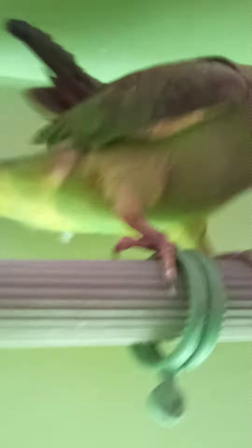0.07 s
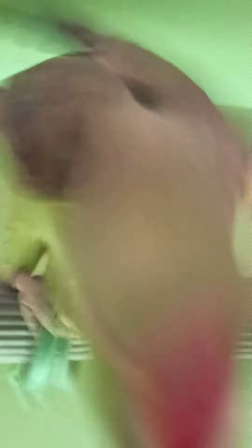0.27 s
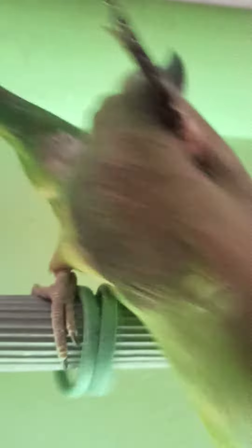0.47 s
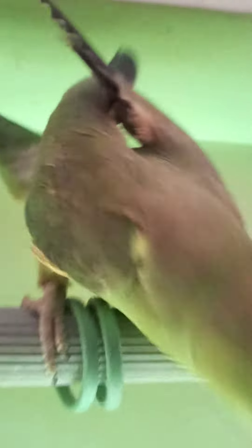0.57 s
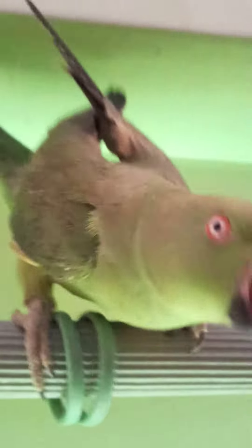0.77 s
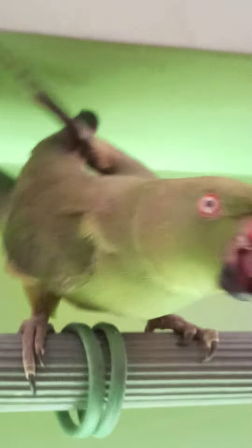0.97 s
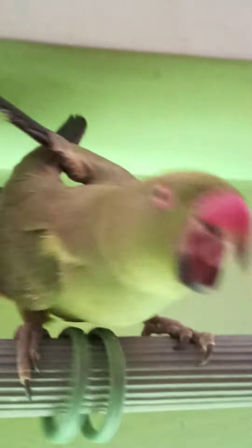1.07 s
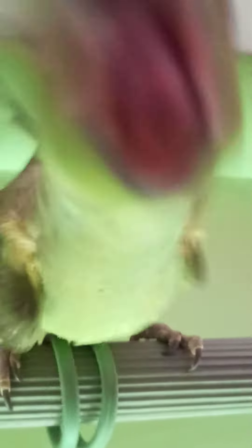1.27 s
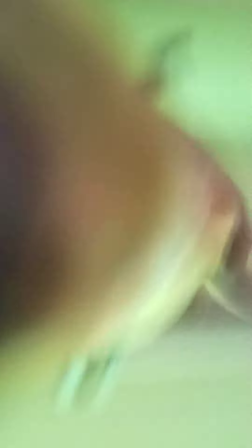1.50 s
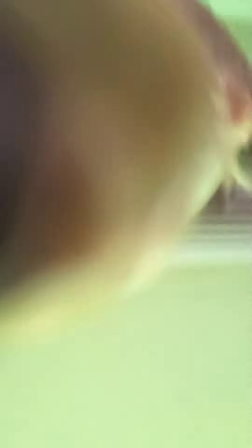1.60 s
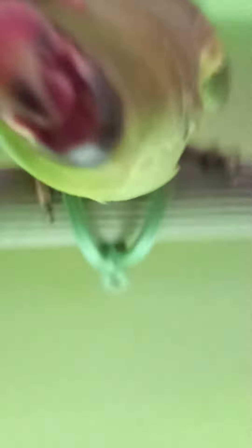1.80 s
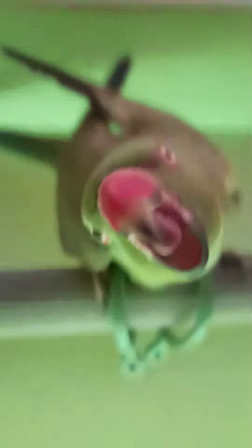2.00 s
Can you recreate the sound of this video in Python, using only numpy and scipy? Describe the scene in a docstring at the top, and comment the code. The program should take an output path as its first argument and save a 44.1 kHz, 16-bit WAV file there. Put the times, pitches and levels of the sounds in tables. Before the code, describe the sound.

A parrot squawks once from about 0.2 to 0.7 seconds, a shrill, rasping, rapidly pulsing call in a small room. Tiny claw ticks follow near 1 second. Its beak knocks and scrapes on the microphone in a quick cluster around 1.4 seconds and a louder one around 1.75, mostly on the left. Feathers rustle softly from 1.5 seconds to the end, over a faint appliance hum.

```python
"""Over a faint appliance hum, a parrot squawks once in a small room: a shrill, overtone-rich tone
from the syrinx, chopped into fast pulses that each arch in pitch. The pulses slow and shorten as
the call runs out. Claws tick on the perch, then the bird pecks and knocks at the microphone's
casing, mostly by the left port, with a soft rustle of feathers."""
import sys
import numpy as np
from scipy import signal
from scipy.fft import rfft, irfft, next_fast_len
from scipy.io import wavfile
from scipy.ndimage import uniform_filter1d, map_coordinates

SR = 44100
rng = np.random.default_rng(int(sys.argv[2]) if len(sys.argv) > 2 else 0)


def store_wav(level_fs):
    """Save 16-bit WAV to argv[1]."""
    pcm = np.round(np.clip(np.atleast_2d(level_fs), -1, 1) * 32767)
    wavfile.write(sys.argv[1], SR, pcm.T.astype(np.int16))


N = 90404
TIME_S = np.arange(N) / SR


def amp(db):
    """Decibels to gain."""
    return 10 ** (np.asarray(db) / 20)


def unit(x):
    """Scale to rms 1."""
    return x / np.sqrt(np.mean(x ** 2) + 1e-20)


def along(points, hz):
    """Read (freq_hz, value) points on a log frequency axis."""
    freqs, values = np.transpose(points)
    return np.interp(np.log(hz + 1), np.log(freqs + 1), values)


def automation(rows):
    """One value per sample for each column after the time."""
    times, *columns = np.transpose(rows)
    return [np.interp(TIME_S, times, column) for column in columns]


def wobble(rate_hz):
    """A smooth random curve, rate_hz knots a second."""
    knots = rng.standard_normal(int(N * rate_hz / SR) + 4)
    return map_coordinates(knots, [TIME_S * rate_hz])


def filtered(x, response):
    """Multiply the spectrum by response(hz)."""
    size = next_fast_len(N + SR // 2)
    return irfft(rfft(x, size) * response(np.fft.rfftfreq(size, 1 / SR)), size)[..., :N]


def eq(x, points):
    """Apply a (freq_hz, gain_db) curve."""
    return filtered(x, lambda hz: amp(along(points, hz)))


def noise(points):
    """Two unrelated coloured noises of rms 1."""
    return unit(eq(rng.standard_normal((2, N)), points))


def pan(db):
    """Constant-power gains, left louder than right by db."""
    return unit(amp([[db / 2], [-db / 2]]))


# Colour of the room tone: freq_hz, gain_db
AIR_EQ = [(25, -15), (50, -28), (90, -6.5), (150, -2), (250, -4), (370, -5), (550, -11), (1000, -15.5),
          (2500, -20.5), (4300, -26.5), (5300, -36), (7000, -30.5), (8500, -35), (12000, -31.5),
          (16000, -31)]
# Left-right likeness of the room tone: freq_hz, correlation
AIR_LIKENESS = [(60, 0.92), (300, 0.53), (700, 0.14), (1500, 0), (16000, 0.041)]

def room_tone(level_db=-45.5):
    """Soft room air, centred in the bass and wide in the treble."""
    def mid_side_gains(hz):
        angle = np.arccos(np.clip(along(AIR_LIKENESS, hz), -1, 1)) / 2
        return np.array([np.cos(angle), np.sin(angle)])

    mid, side = filtered(noise(AIR_EQ), mid_side_gains)
    return amp(level_db) * unit(np.array([mid + side, mid - side]))


# Partials of the appliance: pitch_hz, level_db
HUM_PARTIALS = [(199.5, -53.5), (399, -56), (598, -69.5)]

def appliance_hum():
    """A low hum whose partials waver slightly in phase."""
    return sum(amp(db) * np.sqrt(2) * np.sin(2 * np.pi * hz * TIME_S + 1.02 * wobble(6.66))
               for hz, db in HUM_PARTIALS)


# Feathers brushing near the microphone: time_s, level_db
RUSTLE_LEVELS = [(0, -66.5), (1.25, -60.5), (1.36, -60), (1.5, -50.5), (1.57, -51), (1.72, -51.5),
                 (1.81, -66), (1.86, -54), (1.92, -48), (1.98, -63), (2.05, -56)]
# Colour of the rustle: freq_hz, gain_db
FEATHER_EQ = [(300, -27), (1000, 4), (2500, 0.5), (4200, 1), (5400, -7.5), (7200, 9), (8500, -6.5),
              (12000, -9), (16000, -14.5)]

def feathers():
    """A soft, uneven rustle on the left as the bird leans in."""
    level_db, = automation(RUSTLE_LEVELS)
    return pan(db=13.5) * amp(level_db + 2.4 * wobble(63)) * noise(FEATHER_EQ)


# Claws on the perch: centre_s, level_db
CLAW_TICKS = [(.9405, -46), (.9790, -32)]
# Colour of a tick: freq_hz, gain_db
CLAW_EQ = [(1000, -22), (3500, -12), (7500, -2.5), (16000, -10)]

def claws(half_length_s=0.00021):
    """The claws shift on the perch with tiny, bright ticks."""
    envelope = sum(amp(db) * np.exp(-((TIME_S - s) / half_length_s) ** 2) for s, db in CLAW_TICKS)
    return envelope * noise(CLAW_EQ)


# Beak scraping into a knock: centre_s, half_length_s, level_db
BEAK_SCRAPES = [(1.437, 0.0077, -40.5), (1.753, 0.0069, -29.5), (1.765, 0.0088, -34),
                (1.776, 0.0049, -24.5)]
# Colour of beak contact, for scrapes and clicks: freq_hz, gain_db
BEAK_EQ = [(200, -1), (1000, 10), (2200, 0), (3300, 0), (4400, 2.5), (5500, -10.5), (7300, 11),
           (8600, -10.5), (12000, -7), (16000, -12.5)]

def beak_scrapes():
    """The beak slides briefly over the casing."""
    envelope = sum(amp(db) * np.exp(-((TIME_S - s) / half_s) ** 2) for s, half_s, db in BEAK_SCRAPES)
    return pan(db=8) * envelope * noise(BEAK_EQ)


# Beak hits on the casing: start_s, thump_db, thump_hz, rattle_db, click_db, pan_left_db
PECKS = [(1.376, -36, 600, -38.5, -61, -3), (1.3883, -5, 453, -16, -12.5, 17.5),
         (1.3962, -14.5, 375, -30, -25, 15), (1.4096, -14, 376, -31.5, -17, 9),
         (1.413, -13.5, 398, -28.5, -25.5, 15), (1.435, -24, 626, -41, -38, 23),
         (1.438, -28, 640, -26.5, -39, 23), (1.4816, -24, 294, -32.5, -19.5, 10.5),
         (1.7373, -25, 288, -35.5, -41, 28), (1.7537, -5.5, 406, -9, -2, 16),
         (1.7597, -14.5, 308, -42, -34, 18), (1.7754, -1, 662, -10, -2, 10),
         (1.7782, -3.5, 301, -22.5, -34, -5), (1.783, -15, 254, -29, -37, 0)]
# Modes of the casing: pitch_hz, gain_db
CASING_MODES = [(620, 7.5), (930, 9.5), (1080, 7.5), (1350, -19), (1680, 3.5)]

def beak_knocks(rise_s=.0002, click_t60_s=.0055, rattle_t60_s=0.011, thump_t60_cycles=7.2):
    """Each peck gives a sharp click, a brief rattle of the casing and a damped thump at the ports."""
    out, click_noise = np.zeros((2, N)), noise(BEAK_EQ)
    t = np.arange(SR // 12) / SR
    rise = 1 - np.exp(-t / rise_s)

    def ring(hz):
        return np.sin(2 * np.pi * (hz * t + rng.random() + rng.random((2, 1)) / 3))

    for start_s, thump_db, thump_hz, rattle_db, click_db, pan_db in PECKS:
        span = slice(round(start_s * SR), round(start_s * SR) + len(t))
        thump = amp(thump_db - 60 * t * thump_hz / thump_t60_cycles) * ring(thump_hz)
        modes = sum(amp(db) * ring(hz * rng.normal(1, 0.1)) for hz, db in CASING_MODES) / 2
        rattle = amp(rattle_db - 60 * t / rattle_t60_s) * modes
        click = amp(click_db - 60 * t / click_t60_s) * click_noise[:, span]
        out[:, span] += pan(pan_db) * rise * (thump + rattle + click)
    return out


# Decay of the small room: freq_hz, t60_s
ROOM_DECAY = [(200, 0.11), (2000, 0.19), (6000, 0.39), (14000, 0.063)]

def room_reverb(x, echoes_db=-8, spread_s=.003, tail_db=-18):
    """The direct sound, quick echoes from the perch and walls, and a short tail, for each port."""
    hz, t, spectrum = signal.stft(rng.standard_normal((2, SR // 3)), SR, nperseg=256)
    decay = amp(-60 * t / along(ROOM_DECAY, hz)[:, None])
    tail = signal.istft(spectrum * decay, SR, nperseg=256)[1]
    impulse = amp(tail_db) * tail / np.linalg.norm(tail[0])
    impulse[:, 0] += 1
    for port in impulse:
        delays = (rng.uniform(.1, 1, 6) * spread_s * SR).astype(int)
        port[delays] += amp(echoes_db) * rng.choice([-1, 1], 6) / np.sqrt(6)
    return signal.fftconvolve(x, impulse, axes=1)[:, :N]


# Pulsing of the call: time_s, rate_hz
PULSE_RATE = [(.237, 152), (.3, 149), (.33, 149), (.37, 141), (.45, 132.5), (.5, 127), (.55, 117),
              (.6, 110.5), (.645, 108), (.66, 80)]
# Centre of the tone, rising then sinking: time_s, pitch_hz
CALL_PITCH = [(.24, 1360), (.3, 1380), (.34, 1410), (.38, 1385), (.45, 1330), (.5, 1345), (.6, 1310)]
# Shape of the pulses: time_s, swing_hz, open_share, jitter_rad
PULSE_SHAPE = [(.24, 335, 0.98, 0.22), (.30, 301, 0.98, 0.31), (.36, 357, 1, 0.25), (.41, 332, 0.84, 0.41),
               (.45, 293, 1, 0.42), (.51, 221, 0.72, 0.57), (.56, 217, 0.66, 1.1), (.66, 285, 0.65, 1.3)]

def syrinx(timing_scatter_s=.00012, size_scatter_db=.8, swing_scatter_hz=22, rasp_rad=.14):
    """The pulse gate and the phase of a running tone that arches in pitch within each pulse."""
    rate_hz, = automation(PULSE_RATE)
    pitch_hz, = automation(CALL_PITCH)
    swing_hz, open_share, jitter_rad = automation(PULSE_SHAPE)
    cycles = np.cumsum(rate_hz) / SR
    cycles -= np.interp(PULSE_RATE[0][0], TIME_S, cycles)
    cycles += timing_scatter_s * rate_hz * wobble(200)
    pulse = np.round(cycles).astype(int)
    size_draw, phase_draw, swing_draw = rng.standard_normal((512, 3))[pulse].T
    across = np.clip(2 * (cycles - pulse) / open_share, -1, 1)  # -1 to 1 through a pulse
    gate = np.cos(np.pi / 2 * across) * amp(size_scatter_db * size_draw)
    arch = (swing_hz + swing_scatter_hz * swing_draw) * open_share / rate_hz * np.sin(np.pi * across)
    centre_phase = 2 * np.pi * np.cumsum(pitch_hz) / SR
    return gate, centre_phase + arch + jitter_rad * phase_draw + rasp_rad * wobble(1500)


def crossfade(centre_s, width_s):
    """A smooth rise from 0 to 1."""
    return (1 + np.tanh((TIME_S - centre_s) / width_s)) / 2


# Resonances of throat and beak, wide open: freq_hz, gain_db
OPEN_EQ = [(400, -24), (900, -7.5), (1230, 1.5), (1380, 9), (1540, -3), (1750, -2), (2000, -4.5),
           (2500, -1), (2950, 7.5), (3400, 10.5), (3900, 3), (4500, 8), (5050, -9.5), (6000, -7),
           (6650, -5.5), (7600, -1), (8500, -19), (16000, -31)]
# The same as they close: freq_hz, gain_db
CLOSING_EQ = [(400, -17), (1100, 7), (1300, 2), (1470, 4), (1620, 6), (2000, -12), (2800, -5.5), (3250, -5),
              (3700, -1.5), (4250, -4), (4650, 5), (4950, -3.5), (6300, -8), (7250, 11), (8100, -22),
              (16000, -29)]

def throat(wave, closing, sag_ratio=0.922):
    """Throat and beak go from open to closing; late in the call their resonances sink."""
    sag = crossfade(centre_s=0.6, width_s=0.13)
    sunk_eq = [(hz * sag_ratio, db) for hz, db in CLOSING_EQ]
    late = (1 - sag) * eq(wave, CLOSING_EQ) + sag * eq(wave, sunk_eq)
    return (1 - closing) * eq(wave, OPEN_EQ) + closing * late


def harmonic(order, gate, phase, closing, lead_rad=0, drift_rad=0.7, flutter_db=1.1):
    """One pulsed, levelled multiple of the tone; the moving head shifts its phase at each port."""
    drift = drift_rad * order * np.array([wobble(34.62), wobble(34.62)]) / 2
    pulses = gate ** min(0.36 * order, 1.4)
    flutter = amp(flutter_db * min(order, 3) * wobble(700))
    tone = np.sin(order * phase + drift + [[lead_rad / 2], [-lead_rad / 2]])
    wave = throat(pulses * flutter * tone, closing)
    power = uniform_filter1d(uniform_filter1d(wave ** 2, size=800), size=800)
    return wave / np.sqrt(abs(power) + 1e-9)


# Mix of the harmonics: time_s, first_db, second_db, third_db, fourth_db, fifth_db
HARMONIC_LEVELS = [(0.243, -33.5, -21.5, -26.5, -32, -30.5), (0.252, -28, -20.5, -22, -27, -28),
                   (0.277, -29.5, -26, -21.5, -28, -24.5), (0.307, -28, -29, -21.5, -21, -24),
                   (0.323, -29, -21.5, -27.5, -36, -23.5), (0.349, -25.5, -18, -17, -15, -22.5),
                   (0.383, -27, -16.5, -14.5, -14, -23), (0.417, -33, -26.5, -29.5, -27.5, -29.5),
                   (0.44, -34.5, -27.5, -18, -25, -32), (0.465, -30, -26, -19.5, -29.5, -20.5),
                   (0.503, -34, -27, -18.5, -28, -21.5), (0.547, -32, -28, -22.5, -30, -36.5),
                   (0.591, -32.5, -32, -23.5, -35, -45), (.63, -41, -40.5, -32.5, -42.5, -48),
                   (0.662, -56.5, -67, -39.5, -56, -51)]
# Each harmonic's place before and after the head turns: early_left_db, late_left_db, left_lead_rad
HARMONIC_PANS = [(-3.5, -2.5, 0.62), (-0.5, 3.5, -1.33), (-3, -6.5, 0.83), (1.5, 0, -1.34), (3, 6.5, -1.9)]
# Hoarse croak under the tone: time_s, level_db
CROAK_LEVELS = [(.24, -30.5), (.27, -47), (.42, -48.5), (.5, -32), (.6, -37), (.645, -34.5), (.66, -36.5),
                (.68, -32.5)]
# Colour of the croak: freq_hz, gain_db
CROAK_EQ = [(200, -14), (450, -3.5), (700, -6), (920, 6.5), (1150, 4.5), (1900, 1), (2700, -1), (3300, 0.5),
            (5000, -34.5)]
# Colour of the breath: freq_hz, gain_db
BREATH_EQ = [(400, -52), (1000, -13), (2000, -11.5), (2800, -5), (3700, 0.5), (4500, -23), (5500, 0),
             (7400, -24), (8600, -2.5), (12000, -12), (16000, -19)]

def squawk(start_s=0.2292, attack_s=0.014, end_s=0.6853, release_s=0.028, gain_db=5):
    """An abrupt call, with croak and breath, whose harmonics swell and fade as the beak moves."""
    gate, phase = syrinx()
    closing = crossfade(centre_s=0.408, width_s=0.034)
    levels_db = automation(HARMONIC_LEVELS)
    tone = np.zeros((2, N))
    for k, (early_db, late_db, lead_rad) in enumerate(HARMONIC_PANS):
        position = (1 - closing) * pan(early_db) + closing * pan(late_db)
        tone += amp(levels_db[k]) * position * harmonic(k + 1, gate, phase, closing, lead_rad)
    upper = unit(sum(harmonic(order, gate, phase, closing) for order in range(7, 11)))
    upper *= amp(levels_db[4] - 15)  # rides the fifth harmonic's level
    croak = amp(automation(CROAK_LEVELS)[0]) * unit(gate * noise(CROAK_EQ))
    breath = amp(levels_db[3] - 7) * unit(gate * noise(BREATH_EQ))  # rides the fourth's
    attack = np.clip((TIME_S - start_s) / attack_s, 0, 1) ** 2
    release = np.clip((end_s - TIME_S) / release_s, 0, 1)
    return amp(gain_db) * attack * release * (tone + upper + croak + breath)


def scene():
    """The squawk in the room, the bird's close, dry movements and the background."""
    call = room_reverb(squawk())
    movements = claws() + beak_knocks() + beak_scrapes() + feathers()
    return call + movements + room_tone() + appliance_hum()


# Microphone response with a deep treble notch: freq_hz, gain_db
MIC_EQ = [(8400, 1), (8900, -19.5), (9500, -39.5), (10900, -53), (11400, -31), (11700, -6)]

def record(dry, low_cut_hz=67, threshold_db=-20, memory_s=0.004, ceiling=.85, top_hz=15900):
    """Bass cut, quick gain control, soft clipping, the microphone's treble notch and band limit."""
    x = signal.sosfilt(signal.butter(2, low_cut_hz, "high", fs=SR, output="sos"), dry)
    pole = np.exp(-1 / (memory_s * SR))
    power = signal.lfilter([1 - pole], [1, -pole], np.mean(x ** 2, axis=0))
    compressed = x / (1 + power / amp(threshold_db) ** 2) ** (1 / 4)
    clipped = compressed / (1 + (compressed / ceiling) ** 8) ** (1 / 8)
    return filtered(eq(clipped, MIC_EQ), lambda hz: hz < top_hz)


dry = scene()
out = record(dry)
store_wav(out)
```